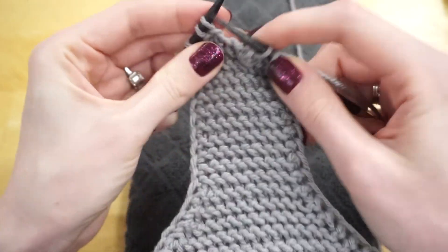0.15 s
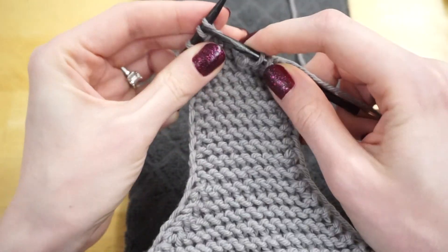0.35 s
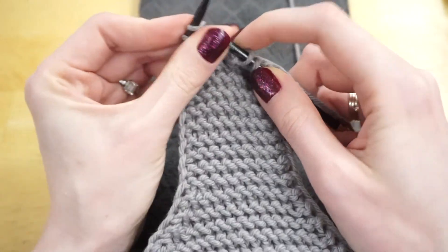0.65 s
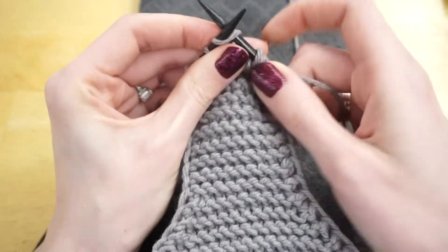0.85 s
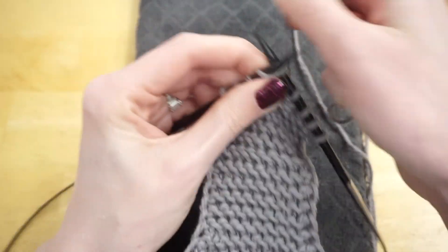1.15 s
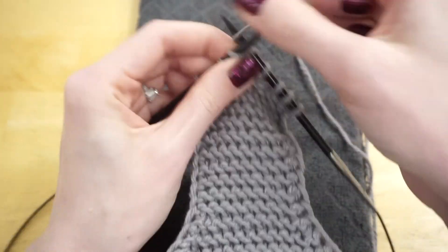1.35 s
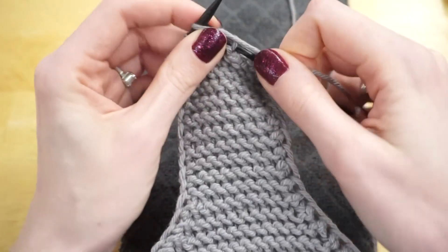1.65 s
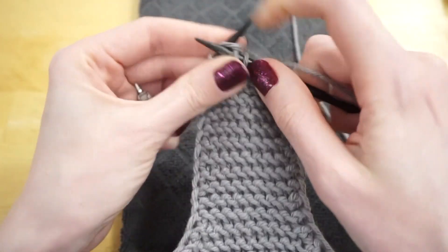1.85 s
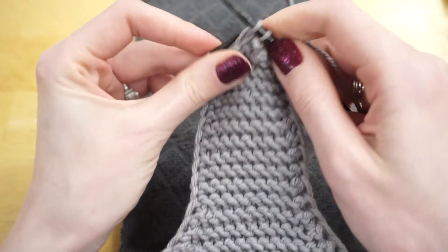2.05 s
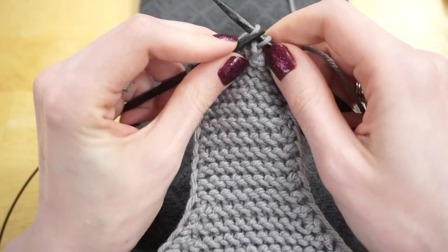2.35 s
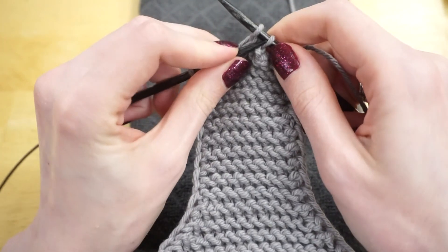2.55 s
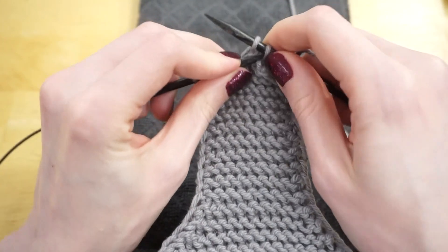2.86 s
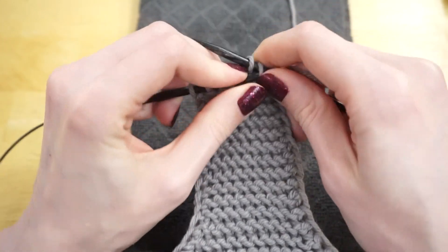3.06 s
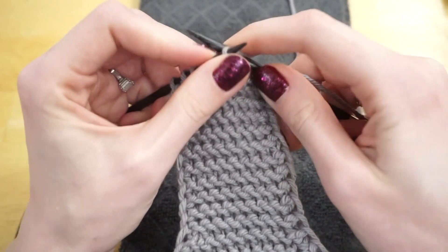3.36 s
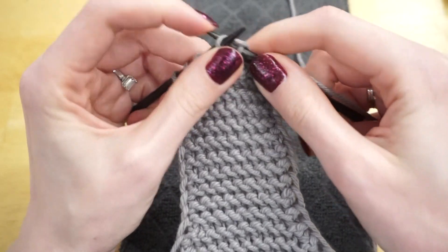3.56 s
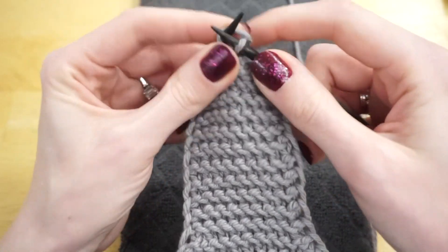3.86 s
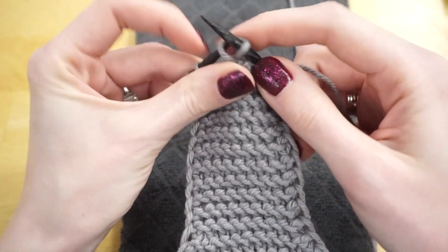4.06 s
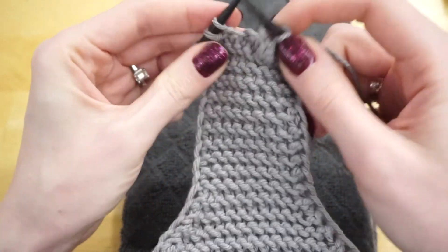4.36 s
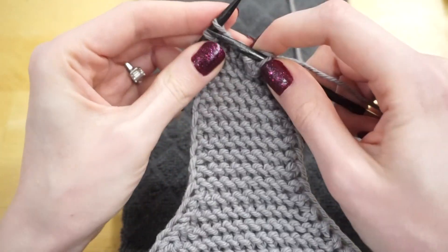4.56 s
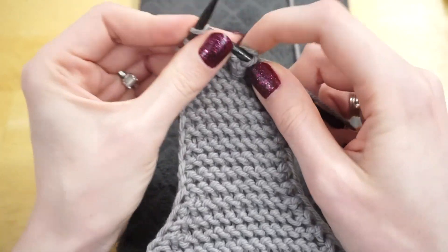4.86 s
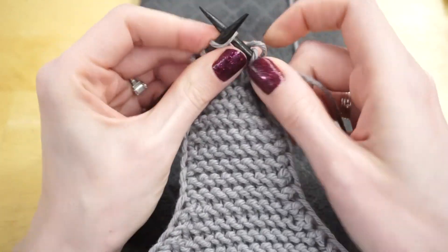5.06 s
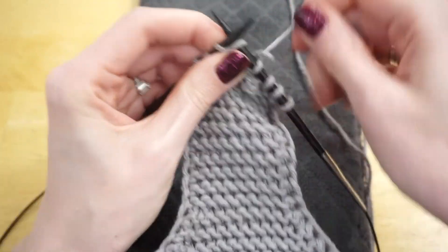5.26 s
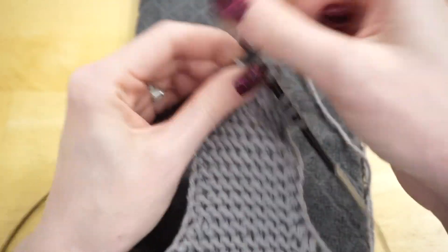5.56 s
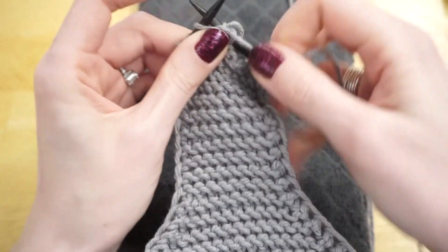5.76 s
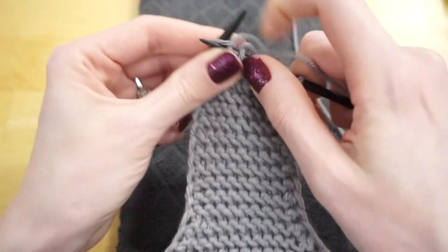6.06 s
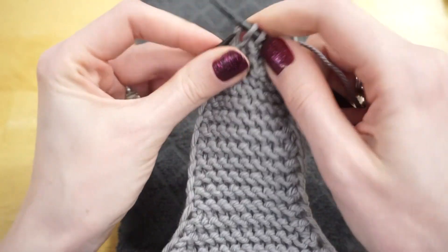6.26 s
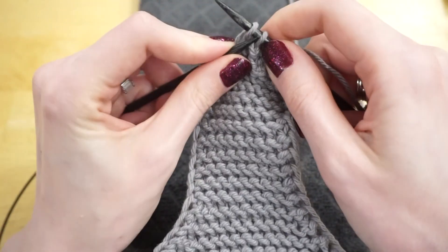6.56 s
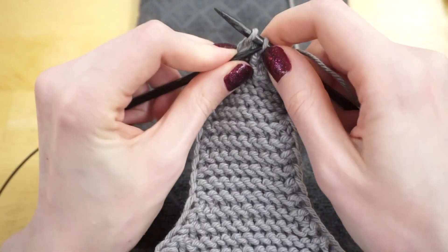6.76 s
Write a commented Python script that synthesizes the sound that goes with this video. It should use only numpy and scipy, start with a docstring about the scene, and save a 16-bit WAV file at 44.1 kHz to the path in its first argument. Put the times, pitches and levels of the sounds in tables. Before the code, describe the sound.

A ventilation fan gives a steady low hum and rumble in a quiet room, one part rubbing with a soft, fast chirp. In front, close to the microphone, someone knits: airy swishes of yarn, light needle scrapes, a dull fabric rustle and small irregular clicks of the tips. The knitting pauses for under a second, carries on, then dies away with one last slide of yarn.

```python
"""Hand knitting close to a stereo microphone in a quiet room. From the start a ventilation fan hums and
rumbles, and a part of it rubs about fifteen times a second, chirping softly. In front, friction makes yarn
hiss over fingers and needles, the needles scrape through the stitches, the fabric rustles and the tips
now and then tick together. Soon after 2 s the hands rest; near 3 s they resume, and after 6.4 s their
strokes fade, with one last slide of yarn over the fan."""
import sys
import numpy as np
from scipy import signal
from scipy.fft import rfft, irfft, next_fast_len
from scipy.io import wavfile
from scipy.ndimage import uniform_filter1d, map_coordinates

SR = 44100
rng = np.random.default_rng(int(sys.argv[2]) if len(sys.argv) > 2 else 0)


def unload_wav(signal):
    """Save mono or channel-first audio to the path in sys.argv[1] as 16-bit WAV at rate SR, clipped to [-1, 1]."""
    wavfile.write(
        sys.argv[1],
        SR,
        np.round(np.clip(np.atleast_2d(signal).T, -1, 1) * 32767).astype(np.int16),
    )


N = 304069
TIME = np.arange(N) / SR
SIZE = 2 * next_fast_len(N // 2 + 4096)  # FFT length, with room for ringing
FREQ = np.maximum(np.arange(SIZE // 2 + 1) * SR / SIZE, 1)

# Bending modes of a needle damped by fingers and wool.
# Each row: frequency in Hz, bandwidth in Hz, relative level in dB.
NEEDLE_MODES = [(647, 200, -4), (1470, 210, -7), (1960, 280, -5.5), (2420, 280, -0.5), (2770, 410, -4.5),
                (3300, 380, -5), (4100, 1100, -2), (4440, 770, -3.5), (5500, 1900, -4)]


def undb(db):
    """Decibels to amplitude gain."""
    return 10 ** (np.asarray(db) / 20)


def unit(x):
    """Scale to rms 1."""
    return x / np.sqrt(np.mean(np.abs(x) ** 2))


def curve(points):
    """Linear interpolation of (seconds, value) points, one value a sample."""
    return np.interp(TIME, *np.transpose(points))


def colour(points):
    """Gain at every frequency from (Hz, dB) points."""
    hz, db = np.transpose(points)
    return undb(np.interp(np.log(FREQ), np.log(hz), db))


def resonances(modes):
    """Gain at every frequency of damped oscillators whose powers add."""
    return np.sqrt(sum(undb(2 * db) / width / (1 + ((FREQ ** 2 - hz ** 2) / (FREQ * width)) ** 2)
                       for hz, width, db in modes))


def shape(x, gain):
    """Filter by multiplying the spectrum."""
    return irfft(rfft(x, SIZE) * gain, SIZE)[..., :N]


def ring(x, gain):
    """Minimum-phase filter with the given gain curve; white noise keeps its power."""
    cepstrum = irfft(np.log(unit(gain) + 1e-9), SIZE)
    cepstrum[1:SIZE // 2] *= 2
    cepstrum[SIZE // 2 + 1:] = 0
    return shape(x, np.exp(rfft(cepstrum)))


def stereo(pair, side):
    """Left and right from a mid and a side signal."""
    return np.array([pair[0] + side * pair[1], pair[0] - side * pair[1]]) / np.sqrt(1 + side ** 2)


def pan(db):
    """Channel gains for a level difference, left minus right."""
    return undb(np.array([db, -db]) / 2)


def walk(rate):
    """Smooth random fluctuation of rms 1, with `rate` new values a second."""
    step = int(SR / rate)
    held = np.repeat(rng.standard_normal(N // step + 1), step)[:N]
    return unit(uniform_filter1d(held, step))


def noise():
    """Two uncorrelated white noises."""
    return rng.standard_normal((2, N))


def slips(rate, spread_db):
    """Stick-slip friction: about `rate` tiny releases a second, a few larger than the rest."""
    size = undb(spread_db * np.minimum(rng.exponential(size=N), 5))
    return unit(noise() * size * (rng.random(N) < rate / SR))


def ventilation(air_db=-50, duct_db=-51, follow=0.56):
    """Flow noise excites duct and room resonances; both swell with the draught."""
    # Spectrum of the moving air. Each row: frequency in Hz, relative density in dB.
    air_spectrum = [(12, -28.5), (25, 3.5), (42, -4), (80, -17), (115, 2), (160, 2.5), (250, 0), (330, -7),
                    (450, -13.5), (650, -19.5), (950, -22.5), (1400, -29), (3000, -31.5), (16000, -35)]
    # Duct and room resonances. Each row: frequency in Hz, bandwidth in Hz, relative level in dB.
    duct_modes = [(29.6, 5.4, -6.5), (53.3, 1.9, -11), (107, 10, -4), (150.5, 10.6, 2), (158.3, 6.2, 0.5),
                  (207, 6.7, -1), (228.6, 5.5, 6), (246.7, 8.5, -2), (245, 6.7, 3), (305.6, 5.3, -4.5),
                  (386, 13.7, -6), (541, 6.7, -12)]
    # Stereo width, narrow in the bass. Each row: frequency in Hz, side minus mid in dB.
    air_width = [(30, -34), (70, -15), (170, -24.5), (280, -13), (500, -4), (1000, 3.5), (3000, 2),
                 (16000, 2)]
    # Strength of the draught. Each row: time in seconds, relative level in dB.
    draught = [(0, -49), (0.5, -49), (1.65, -46.5), (2.2, -48.5), (2.8, -50), (3.3, -49), (3.7, -45.5),
               (4.3, -51), (4.5, -48), (5.35, -49.5), (6.45, -51.5), (6.7, -50.5)]
    draught_db = curve(draught)
    swell = undb(follow * (draught_db - draught_db.mean()))
    air = ring(noise(), colour(air_spectrum)) * undb(air_db)
    duct_tilt = colour([(20, 2.5), (560, -2.5), (1200, -26)])
    duct = ring(noise(), resonances(duct_modes) * duct_tilt) * undb(duct_db)
    # the deepest rumble and the high hiss stay nearly steady
    body = shape(air + duct, colour([(90, -36), (150, 6), (700, -2), (2000, -15)]))
    mid, side = air + duct + body * (swell - 1)
    side = shape(side, colour(air_width))
    return np.array([mid + side, mid - side]) * pan(0.18)[:, None]


def motor(shaft_hz=57.4, mains_hz=120.7, whine_hz=10200, waver_db=2.8, mains_db=-62, whine_db=-78):
    """Forced vibration: an uneven shaft drone and a wavering mains hum, with a thin whine far above."""
    # Drone of the shaft. Each row: time in seconds, relative level in dB.
    drone_levels = [(0, -60), (2.2, -61), (3.3, -61), (3.9, -60), (4.3, -65), (4.75, -56), (5.15, -54),
                    (5.65, -64), (6.45, -57), (6.89, -64)]
    drone_gain = undb(curve(drone_levels) - 3 + waver_db * walk(7))
    drone = drone_gain * unit(np.sin(2 * np.pi * np.cumsum(shaft_hz + walk(8)) / SR))
    hum = undb(mains_db + 0.37 * walk(1.2)) * unit(np.sin(2 * np.pi * mains_hz * TIME))
    whine = undb(whine_db) * ring(noise(), resonances([(whine_hz, 250, 0)]))
    return drone + hum + whine


def chirps(turn_hz=14.986, first_rub_s=0.052, jitter_s=0.01, length_s=0.0086, lead_s=0.0053, ring_s=0.012):
    """Friction excites resonance: a fan part rubs once a turn, mostly faintly, ringing close modes."""
    # The hardest rubs, each peaking lead_s early. Each row: time in seconds, level in dB.
    hard_rubs = [(0.658, -58), (0.923, -57), (1.395, -48.5), (1.465, -54), (1.793, -54.5), (2.798, -55.5),
                 (4.463, -54), (4.731, -54.5), (4.864, -54.5), (6.682, -57)]
    # Rubbing on the other turns. Each row: time in seconds, relative level in dB.
    faint_rubs = [(0, -60.5), (1.1, -62), (1.5, -59), (2.2, -59), (2.65, -63.5), (3.3, -70), (4.3, -61),
                  (4.55, -54), (5.05, -56), (5.4, -65), (6.3, -69), (6.85, -59)]
    # Modes rung by the rubbing. Each row: frequency in Hz, bandwidth in Hz, relative level in dB.
    modes = [(923, 31.5, 4), (990, 90.2, 2), (1069, 31.5, 3)]
    loud = sum(undb(db) * np.exp(-.5 * ((TIME - s + lead_s) / length_s) ** 2) for s, db in hard_rubs)
    turns = turn_hz * (TIME - first_rub_s + jitter_s * walk(turn_hz))
    touch = np.cos(np.pi * turns) ** 4
    faint = undb(curve(faint_rubs) - 2 + 1.5 * walk(2 * turn_hz)) * touch
    hold = np.exp(-1 / (ring_s * SR))
    envelope = signal.lfilter([1 - hold], [1, -hold], np.maximum(loud, faint))
    # each side hears the modes by other paths, so their phases wander apart
    tones = np.zeros((2, N))
    for channel in tones:
        for hz, width, db in modes:
            channel += undb(db) * np.sin(2 * np.pi * np.cumsum(hz + width / 2 * walk(200)) / SR)
    return stereo(unit(tones), side=0.25) * envelope * undb(1.5 * walk(250))


def strokes(roundness=1.27, linger_db=-16, linger_s=0.26):
    """Incoherent sources add in power: the rubbing and scraping levels in dB of overlapping strokes."""
    # Pushes and pulls of the hands. Each row: peak time, rise and fall in seconds,
    # then relative levels of yarn rubbing and needle scraping in dB.
    hand_strokes = [(0.016, 0.12, 0.094, -49, -71), (0.169, 0.025, .11, -59.5, -62.5),
                    (0.449, .017, .018, -55, -76), (0.586, 0.011, 0.018, -48.5, -58),
                    (0.753, .042, .044, -48.5, -55.5), (0.952, 0.07, .028, -60, -61),
                    (1.012, .067, .041, -49.5, -66), (1.155, 0.13, 0.098, -48, -64),
                    (1.268, 0.053, 0.05, -47, -59.5), (1.336, 0.016, 0.024, -47, -67),
                    (1.421, 0.034, 0.025, -54, -61), (1.487, 0.025, 0.036, -53.5, -61.5),
                    (1.592, 0.014, .035, -63, -54), (1.673, 0.068, .024, -48, -55.5),
                    (1.718, .06, .039, -55.5, -58.5), (1.88, .095, 0.062, -48.5, -58.5),
                    (1.963, .023, .014, -46, -61), (2.01, 0.0079, 0.082, -51, -69),
                    (2.055, 0.013, 0.022, -56, -55), (2.106, 0.015, 0.15, -52.5, -66),
                    (2.944, .019, 0.065, -60, -81), (3.013, .023, 0.062, -53.5, -73.5),
                    (3.213, .057, 0.068, -51.5, -61), (3.452, .022, .023, -56, -67),
                    (3.616, 0.098, 0.039, -52, -62), (3.888, 0.16, 0.11, -55, -64),
                    (3.999, .035, 0.12, -58, -66), (4.148, 0.036, 0.045, -57, -58.5),
                    (4.258, 0.023, 0.02, -53, -73), (4.305, 0.1, 0.14, -53.5, -62.5),
                    (4.642, .022, .034, -57, -73), (4.802, 0.012, 0.01, -46, -56),
                    (4.966, 0.063, 0.02, -47.5, -59), (5.19, .054, 0.12, -51.5, -61),
                    (5.275, 0.025, 0.028, -55, -52), (5.355, 0.082, 0.039, -46.5, -55.5),
                    (5.477, .07, 0.092, -48, -67), (5.612, 0.0059, 0.045, -49, -57),
                    (5.674, .009, 0.091, -52, -55.5), (5.885, 0.052, .11, -49, -56.5),
                    (6.055, .033, 0.22, -50, -63), (6.177, 0.016, .014, -45.5, -63),
                    (6.343, 0.1, 0.16, -56, -65.5), (6.859, 0.0094, .016, -56, -63)]
    rub, drag = np.zeros((2, N))
    for s, rise, fall, rub_db, scrape_db in hand_strokes:
        t = TIME - s
        swell = np.exp(-2 * np.abs(t / np.where(t < 0, rise, fall)) ** roundness)
        # the fingers slide on faintly around every stroke
        linger = undb(linger_db) ** 2 * np.exp(-2 * np.abs(t) / linger_s)
        rub += (swell + linger) * undb(rub_db) ** 2
        drag += (swell + linger) * undb(scrape_db) ** 2
    return 10 * np.log10(rub), 10 * np.log10(drag)


def fabric(scrape_db, gain_db=-6):
    """Sparse frictional slips: each push of a needle shifts the knitted piece, which rustles dully."""
    # Spectrum of the rustle. Each row: frequency in Hz, relative density in dB.
    rustle_spectrum = [(120, -25), (300, 5), (500, -7.5), (800, -4), (1400, -11), (3000, -31)]
    folds = stereo(slips(rate=500, spread_db=3.5), side=0.49)
    return ring(folds * undb(scrape_db + gain_db), colour(rustle_spectrum))


def scrape(scrape_db):
    """Stick-slip friction rings the bending modes of a needle as it drags through the stitch."""
    drag = stereo(slips(rate=3500, spread_db=0.5), side=0.8) * undb(2.1 * walk(70))
    return ring(drag * undb(scrape_db - 3.5), resonances(NEEDLE_MODES))


def clicks(echo_db=-16, echo_s=0.017, snap=2.4):
    """Impact: the tips meet and skid, the shaft rings in its modes, table and walls reflect faintly."""
    # Needle contacts. Each row: start in seconds, tick and shaft levels in dB,
    # base decay time in seconds, left minus right in dB.
    contacts = [(0.1517, -40, -48, 0.0026, 2), (0.2023, -50, -58, 0.0017, 1), (0.615, -64, -60, 0.0039, 0),
                (1.0693, -54, -53.5, 0.0033, 0), (1.1100, -60, -59, 0.001, -2),
                (1.1216, -57, -51.5, 0.0035, 1), (1.5767, -46.5, -49.5, 0.0021, -2),
                (1.686, -48.5, -51, 0.0023, 1), (2.0455, -47.5, -58, 0.0012, 2),
                (2.178, -55, -58, 0.0026, -3), (2.4346, -48.5, -68, 0.0011, -1),
                (3.0543, -57, -76, 0.001, -3), (3.0777, -49.5, -69, 0.0023, -5),
                (3.1198, -56, -75, 0.0011, -2), (3.1354, -53, -72, 0.0017, -4),
                (3.62, -51, -59.5, 0.0037, -3), (4.1337, -44.5, -51, 0.0035, 3),
                (4.3936, -47, -53, 0.0024, -2), (4.8405, -55, -64, 0.0017, 1),
                (5.2336, -50, -59, 0.0011, 0), (5.2611, -48, -48, 0.0025, 1), (5.6087, -53, -56, 0.0018, 4),
                (5.8328, -52, -53, 0.0029, -4), (6.1036, -49, -61, 0.001, -1), (6.1843, -49, -59, 0.004, 4),
                (6.4074, -48.5, -55, 0.0035, -1)]
    # Spectrum of a tip contact. Each row: frequency in Hz, relative density in dB.
    tick_spectrum = [(1000, -42), (3500, -46), (6000, -2), (9000, -1), (10800, 2.5), (13000, -0.5),
                     (16000, -3)]
    # A light tap barely stirs the low modes. Each row: frequency in Hz, relative gain in dB.
    tap_spectrum = [(600, -20), (1500, -7), (2400, 0), (6000, 0)]
    tick, shaft = np.zeros((2, 2, N))
    t = np.arange(SR // 10) / SR
    window = SR / 200  # a blow carries the energy of about 5 ms at its level
    echo = undb(echo_db) * np.exp(-t / echo_s) / np.sqrt(echo_s * SR / 2)
    for s, tick_db, shaft_db, decay, pan_db in contacts:
        start = int(s * SR)
        for track, db, tau, side in ((tick, tick_db, decay / 2, .6), (shaft, shaft_db, decay * 2, .9)):
            skid = stereo(rng.standard_normal((2, len(t))), side) * np.exp(-t / tau)
            skid[:, 0] += snap  # the first touch is the hardest
            blow = unit(skid) / np.sqrt(len(t)) + echo * rng.standard_normal((2, len(t)))
            blow *= undb(db) * np.sqrt(window) * pan(pan_db)[:, None]
            track[:, start:start + len(t)] += blow[:, :N - start]
    shaft_response = resonances(NEEDLE_MODES) * colour(tap_spectrum)
    return ring(tick, colour(tick_spectrum)) + ring(shaft, shaft_response)


def swishes(width_hz=1900):
    """Narrow-band friction noise: taut yarn runs over a needle, a faster slide giving a higher band."""
    # Quick slides of yarn. Each row: peak time and half length in seconds,
    # band centre in Hz, level in dB, left minus right in dB.
    slides = [(0.757, 0.032, 5800, -56, 2), (0.758, 0.012, 9700, -48.5, 0), (0.95, 0.02, 14100, -52, -7),
              (1.01, .018, 9000, -54, -4), (1.17, 0.021, 9200, -52.5, -6), (1.245, .013, 14600, -49, 0),
              (1.412, 0.0041, 14000, -44, -3), (1.482, 0.0082, 14500, -48, 0),
              (1.651, 0.013, 10600, -49, 0), (3.145, .015, 15000, -56, -3), (3.208, 0.016, 14400, -51, -3),
              (3.466, .006, 14500, -52, -4), (3.764, 0.0043, 5400, -57.5, 1),
              (4.083, 0.015, 10800, -57.5, 3), (4.718, 0.074, 6270, -66, 0), (4.95, 0.032, 6430, -57, 3),
              (5.15, .022, 14500, -56, -8), (5.349, 0.018, 2900, -54.5, -1), (5.463, .018, 14100, -52, -4),
              (5.51, 0.032, 5180, -56.5, -2), (6.07, 0.027, 13900, -48, -1), (6.174, 0.0095, 4490, -54, 9),
              (6.858, .007, 13700, -55, 3)]
    out = np.zeros((2, N))
    lowpass = signal.butter(2, width_hz / 2, fs=SR, output="sos")
    baseband = unit(signal.sosfilt(lowpass, stereo(noise() + 1j * noise(), side=0.85)))
    for s, length, hz, db, pan_db in slides:
        near = np.abs(TIME - s) < 4 * length
        t = TIME[near] - s
        hiss = np.sqrt(2) * np.real(baseband[:, near] * np.exp(2j * np.pi * hz * t))
        out[:, near] += hiss * np.exp(-.5 * (t / length) ** 2) * undb(db) * pan(pan_db)[:, None]
    return out


def hand_reflection(x, lag_s=0.000493, drift=0.248, share=0.32):
    """Comb filtering: a reflection off the moving hands adds shifting peaks and dips to each side."""
    positions = [np.arange(N) - SR * lag_s * np.exp(drift * walk(5)) for _ in x]
    reflected = np.array([map_coordinates(side, [at], order=3) for side, at in zip(x, positions)])
    return unit(x + share * reflected)


def yarn(rub_db):
    """Dense stick-slip friction: fibres catch and let go as the yarn slides; its tension flutters."""
    # Spectrum of sliding yarn. Each row: frequency in Hz, relative density in dB.
    hiss_spectrum = [(300, -13.5), (800, -14), (1600, -26), (3500, -15), (5000, -9), (7000, -4), (8500, -3),
                     (10000, -.5), (11500, -1), (13000, 1), (16000, -2.5)]
    # The right hand swings the yarn out to its side.
    # Each row: peak time and half length in seconds, left minus right in dB.
    swings = [(1.13, 0.15, -4), (3.35, 0.35, -1), (5.35, 0.16, -4)]
    pan_db = sum(db * np.exp(-.5 * ((TIME - s) / length) ** 2) for s, length, db in swings)
    fibres = hand_reflection(stereo(slips(rate=15000, spread_db=1.4), side=0.5))
    flutter = undb(0.99 * walk(120))
    return ring(fibres * flutter * undb(rub_db + 0.5), colour(hiss_spectrum)) * pan(pan_db)


def scene():
    """Superposition of the knitting in front and the fan behind."""
    rub_db, scrape_db = strokes()
    knitting = yarn(rub_db) + scrape(scrape_db) + fabric(scrape_db) + swishes() + clicks()
    return knitting + chirps() + ventilation() + motor()


def record(dry, top_hz=15800):
    """Frequency response: the left microphone is fuller, the right brighter; a low-pass cuts the top."""
    lean = colour([(150, 0.024), (500, 0.42), (1200, 0.4), (2500, -0.45),
                   (4500, 0.31), (8000, 0.12), (12000, -0.71)])
    heard = shape(dry, np.array([lean, 1 / lean]))
    return signal.sosfilt(signal.ellip(10, .1, 70, top_hz, fs=SR, output="sos"), heard)


dry = scene()
out = record(dry)
unload_wav(out)
```